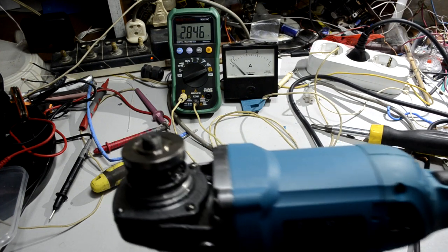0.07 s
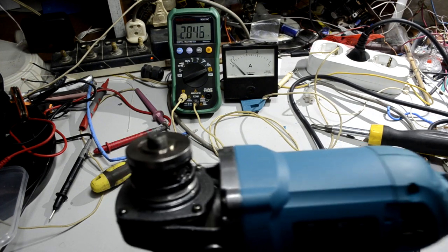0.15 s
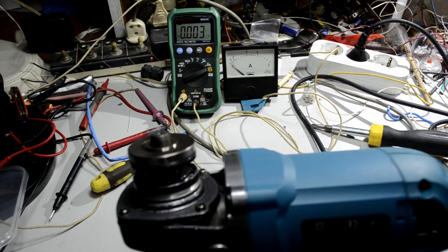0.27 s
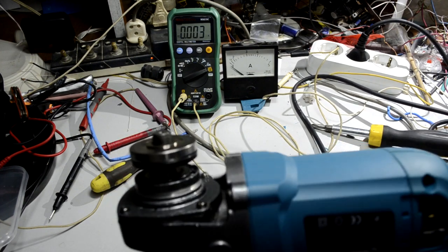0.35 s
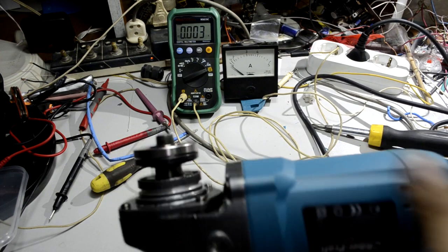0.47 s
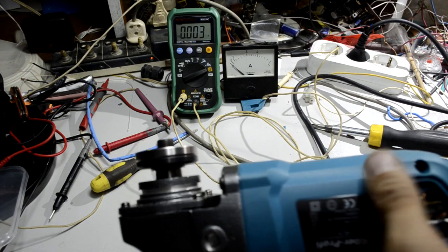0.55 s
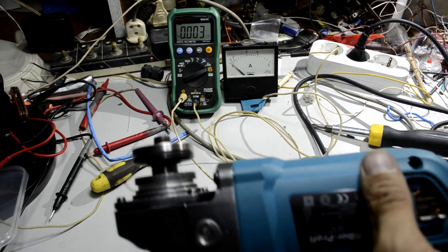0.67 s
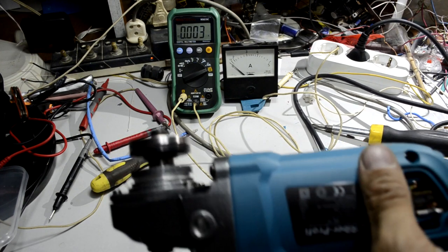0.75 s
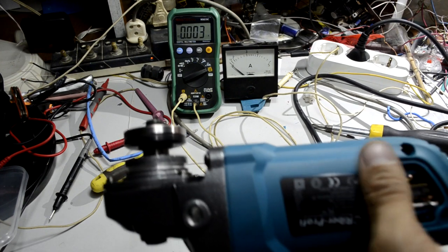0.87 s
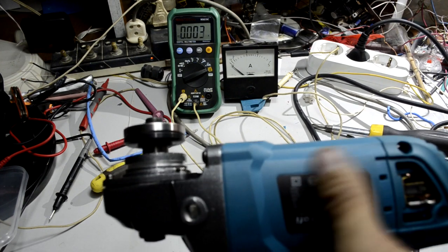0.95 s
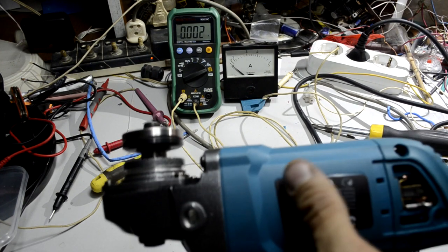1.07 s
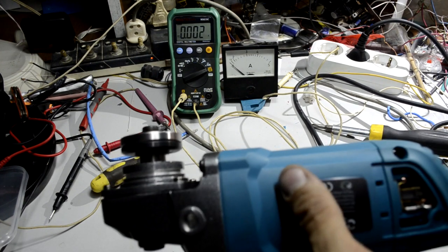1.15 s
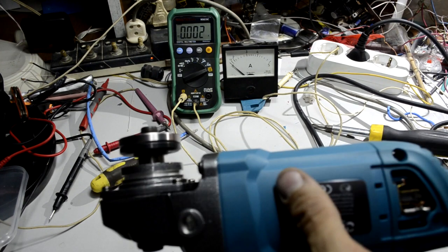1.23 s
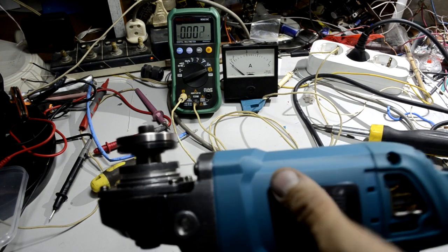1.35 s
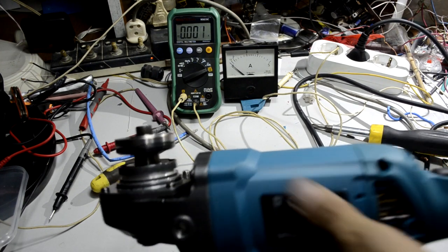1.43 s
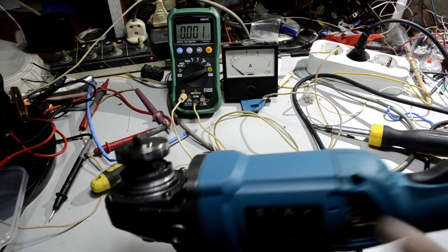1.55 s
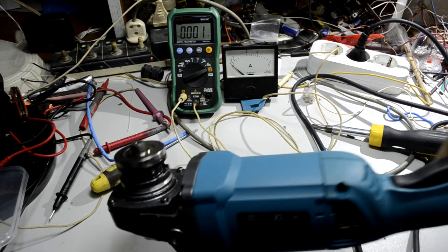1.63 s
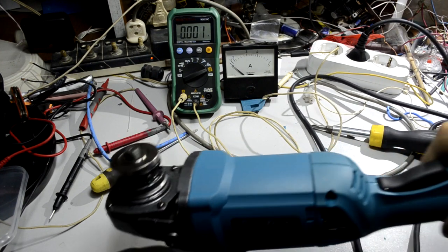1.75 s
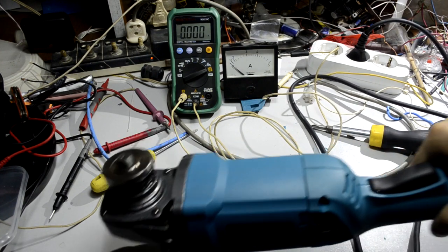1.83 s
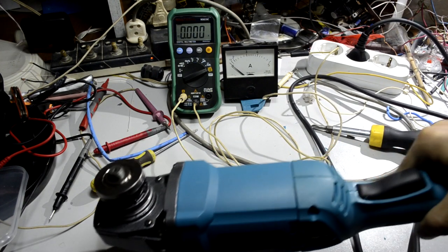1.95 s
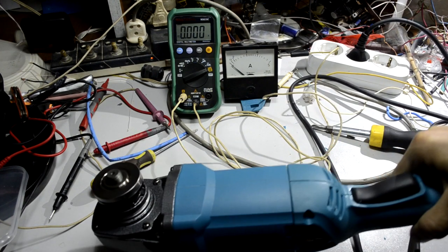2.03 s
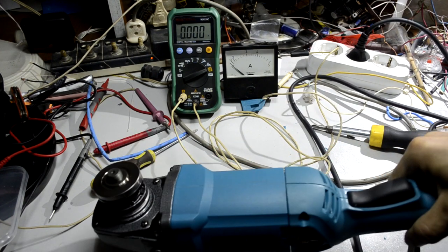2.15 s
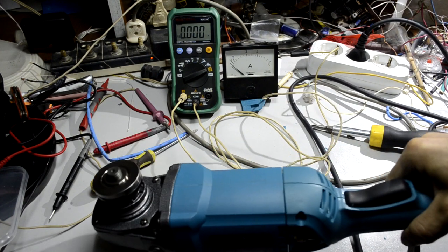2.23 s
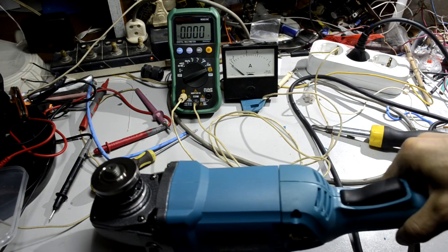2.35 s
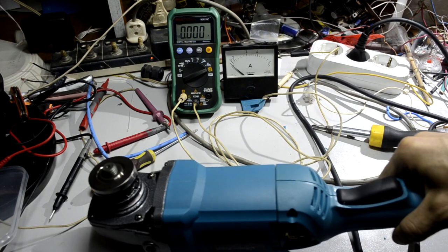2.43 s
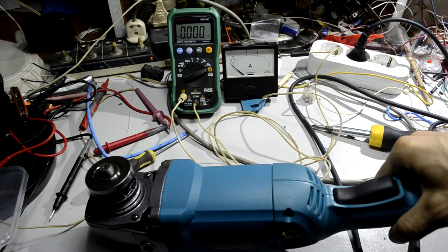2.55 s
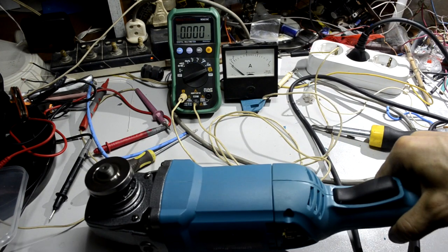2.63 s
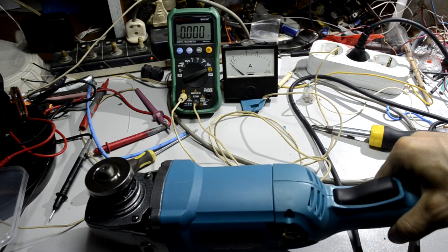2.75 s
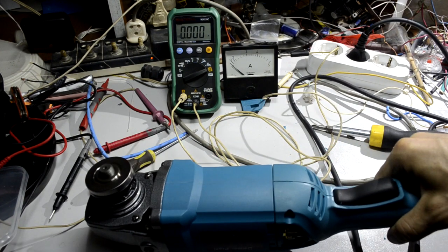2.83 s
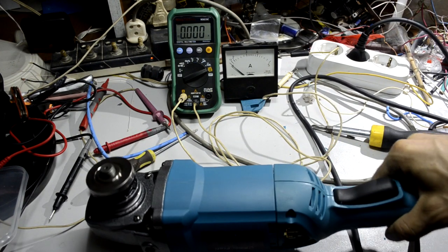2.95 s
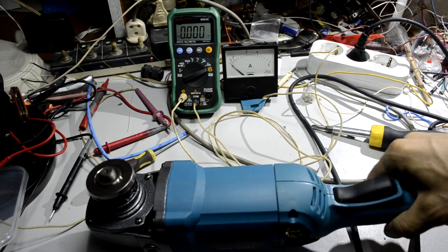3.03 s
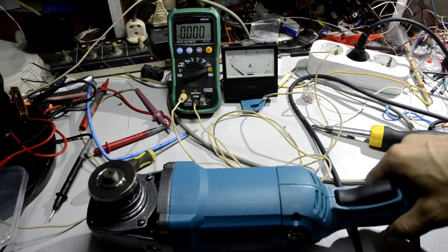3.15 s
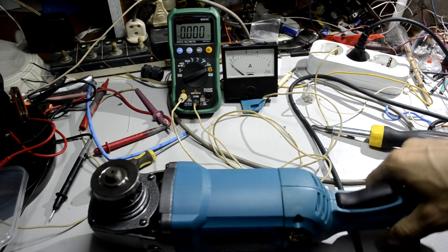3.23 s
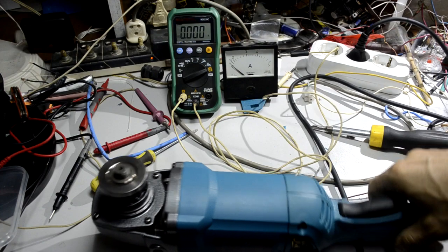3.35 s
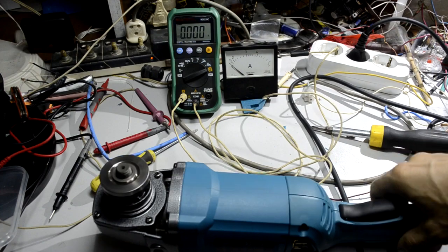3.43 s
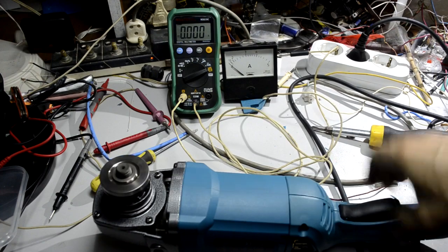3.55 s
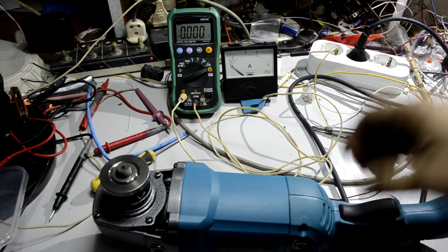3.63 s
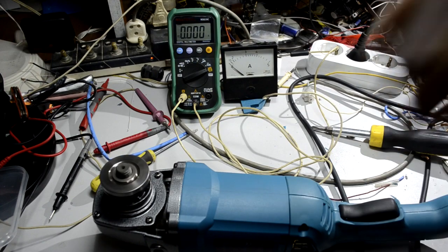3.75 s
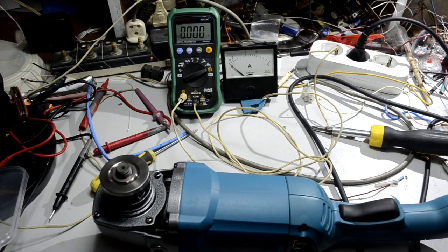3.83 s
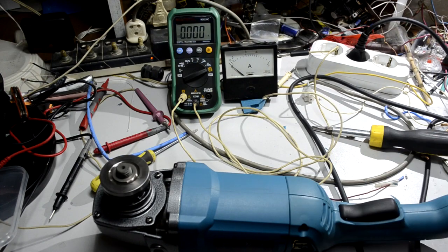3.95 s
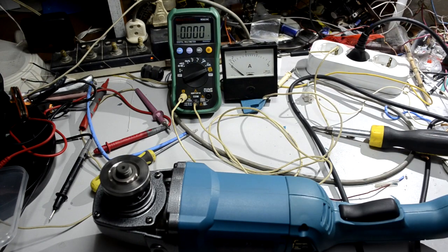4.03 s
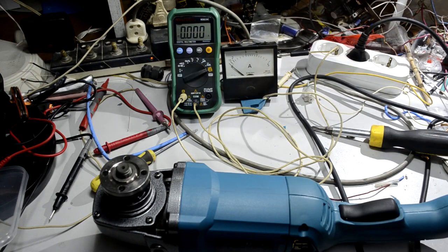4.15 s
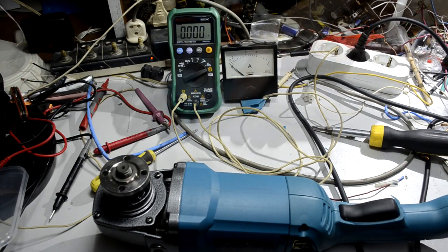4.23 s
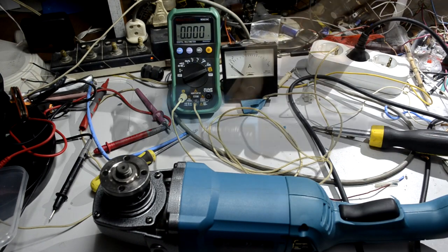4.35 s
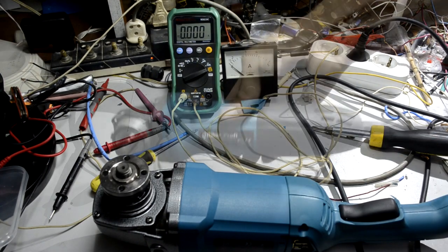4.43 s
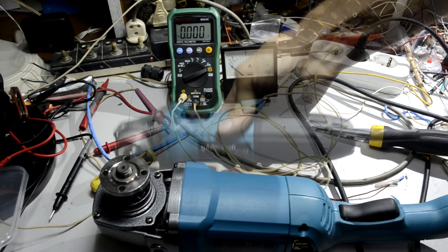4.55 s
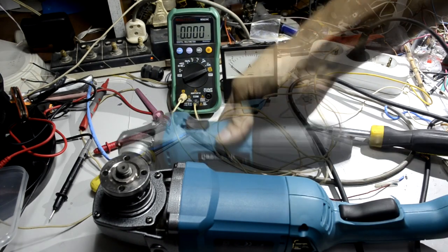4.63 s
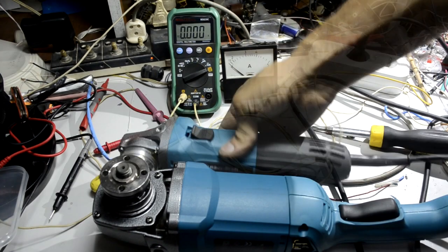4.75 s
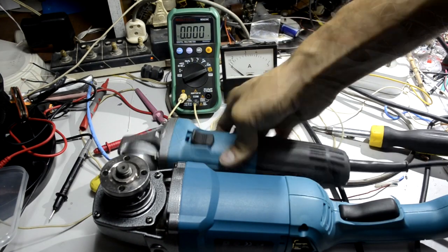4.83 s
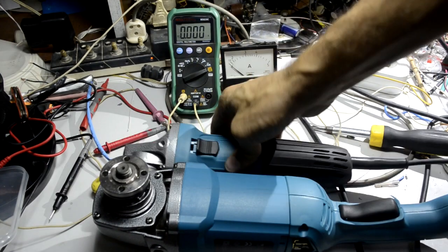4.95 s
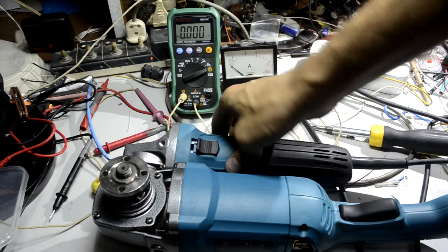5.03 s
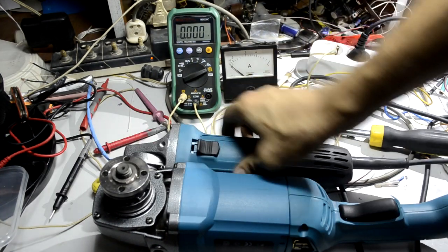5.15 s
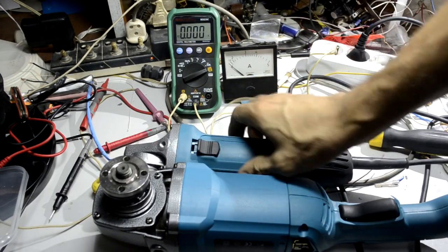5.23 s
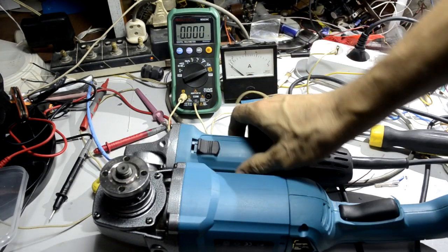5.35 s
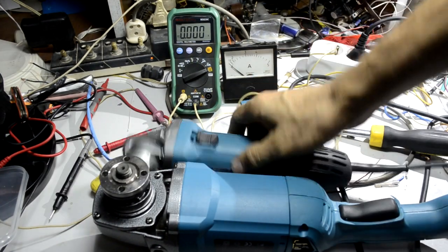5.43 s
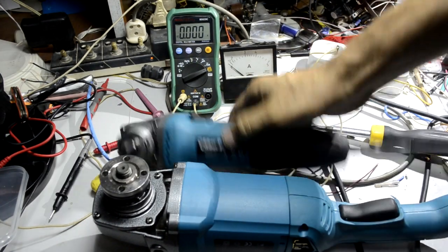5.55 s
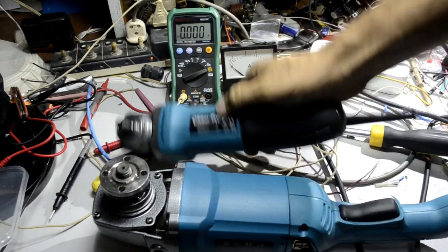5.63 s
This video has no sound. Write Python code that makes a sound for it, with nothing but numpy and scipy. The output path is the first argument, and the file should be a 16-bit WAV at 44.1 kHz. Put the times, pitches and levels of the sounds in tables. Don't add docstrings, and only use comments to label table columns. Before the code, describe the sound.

At 0 s a loud, rough roar is already falling: an angle grinder with no disc, switched off, very near the microphone. Fan air, bright brush hiss and harsh loose-gear rattle blend with thin tones that sink as the rotor slows. From about 0.8 s sharp tooth snaps crowd in. Around 1.5 s the gear head swings towards us, and the rattle changes colour, becoming more ringing and hollow. Soft, low thuds at 2.3-2.5 s, partly hidden, place it on a workbench. By 2.9 s the chatter has thinned to distinct metallic clacks, strongest near 3.1 s, then weaker and wider apart, ending in tiny clicks around 4.05-4.15 s. Quiet room tone with faint hum remains. A second tool knocks lightly on the bench, clearest at 4.66 and 4.94 s, with smaller taps and a faint grainy slide, strongest near 5.4 s, until about 5.7 s. Short room echo, mono sound.

```python
import sys
import numpy as np
from scipy import signal
from scipy.fft import rfft, irfft
from scipy.io import wavfile
from scipy.ndimage import uniform_filter1d, map_coordinates

SR = 44100
rng = np.random.default_rng(int(sys.argv[2]) if len(sys.argv) > 2 else 0)


def nominal_scale(level):
    x = np.asarray(level, float) / 20
    return 10 ** x


def digitize_waveform(pressure):
    field = np.atleast_2d(pressure).T
    bounded = np.clip(field, -1, 1)
    quanta = np.round(bounded * 32767).astype(np.int16)
    wavfile.write(sys.argv[1], SR, quanta)


N = 250913

# start_s, share_0_to_1
HEAD_TURN = [
    (0, 0.19),
    (1.47, 0.23),
    (1.57, 0.58),
    (5.7, 0.9),
]
# multiple_of_rotor_speed, level_db
BRUSH_OVERTONES = [(36, -14), (48, 2), (72, 0), (96, 3), (120, -1), (144, -2), (168, 0), (192, 0), (216, 0),
                   (240, 0)]
BLADE_TONES = [(29, 0), (39, -10)]

# pitch_hz, level_db
ROAR_COLOUR = [(41, -58), (70, -37.5), (237, -14.5), (324, -19.5), (399, -7), (449, -10), (749, -1.5),
               (799, -5), (865, 0), (1600, -10), (2080, -29.5), (3520, -120)]
SIDE_COLOUR = [(530, -33), (900, 0.5), (1680, -5.5), (2040, -2.5), (2630, -1), (3260, -4.5), (3760, -5.5),
               (6000, -26.5), (7800, -74.5), (13200, -120)]
HEAD_COLOUR = [(530, -38.5), (900, 2), (1270, -17.5), (1870, -3.5), (2050, -3.5), (2310, -4), (4400, -12),
               (6000, -34), (7800, -50), (13200, -120)]
HISS_COLOUR = [(2530, -31.5), (4300, -0.5), (4740, -11), (5860, -9.5), (6630, -9.5), (7510, -10),
               (8840, -11), (9490, -13.5), (11800, -12), (13800, -16.5), (15700, -31.5)]
BRUSH_COLOUR = [(2500, -30), (4300, -12), (6500, -8), (8500, -11), (10500, -6), (12000, -3), (15500, -5)]
DARK_COLOUR = [(20, -60), (1200, -45), (9000, -45), (16000, -70)]
SNAP_SIDE_COLOUR = [(300, -40), (1000, -9), (1800, -2), (2600, -4), (3300, 0), (4300, -8), (5200, -28),
                    (9000, -32), (15000, -55)]
SNAP_HEAD_COLOUR = [(300, -40), (900, -7), (1450, 0), (1800, -4), (2700, -4), (3300, -8), (4400, -12),
                    (5200, -30), (15000, -60)]
CLACK_COLOUR = [(150, -72), (250, -40.5), (1470, -1), (1780, -4), (2010, -8), (2310, -19), (3200, -14),
                (3420, -26), (4260, -28), (6500, -42), (8450, -70), (14300, -120)]
THUMP_COLOUR = [(120, -34), (280, -5), (520, 0.5), (850, -4), (1300, -22), (3000, -59)]
TICK_COLOUR = [(1500, -52), (2800, -9.5), (3800, 11.5), (4700, -0.5), (6000, -17), (12000, -43.5),
               (16000, -52)]
ROOM_COLOUR = [(15, -39), (25, -2.5), (71, -26.5), (91, -16.5), (246, -12.5), (297, -10), (457, -7),
               (1140, -11), (2360, -19), (3530, -21), (4500, -34), (13500, -39), (15500, -31.5)]
SLIDE_COLOUR = [(120, -24.5), (200, -3.5), (433, -12), (575, -17.5), (657, -33), (708, -17.5),
                (1300, -11.5), (1810, -12), (7000, -45.5), (9100, -70), (15400, -120)]
RUMBLE_COLOUR = [(25, -21.5), (60, -6), (110, 1), (170, -4), (260, -27.5), (600, -74)]
MICROPHONE_RANGE = [(15, -30), (45, -4), (80, 0), (15800, 0), (15950, -70)]

# pitch_hz, width_hz, lift_db
SHELL_RINGS = [(379.5, 13, 3), (786, 17, 7), (855, 71, 5), (986, 16, 8.5), (1094, 40, 8.5)]
CASE_SIDE_RINGS = [(1590, 36, 2.6), (1850, 90, 4), (2060, 70, 4), (2330, 55, 5.7), (3190, 100, 3),
                   (3370, 70, 4.4), (4270, 67, 7.3)]
CASE_HEAD_RINGS = [(1290, 60, -6), (1490, 25, 3), (1610, 50, 2.8), (2016, 41, 6), (2595, 54, 3.5),
                   (2764, 94, 3.4), (3010, 49, 4), (4340, 40, 9.5)]
VENT_RINGS = [(7440, 110, 6.3), (7660, 280, 1.5), (8000, 90, 1.7), (10080, 450, 1.7), (11470, 190, 2.1)]
SPINDLE_RINGS = [(7320, 420, 22), (7810, 640, 30.5), (11790, 760, 32)]
UPPER_RINGS = [(3250, 1100, 35), (3165, 110, 13), (3420, 90, 7)]
LOWER_RINGS = [(2040, 550, 24), (2016, 50, 11)]
BEARING_DIP = [(400, 500, -13)]
SNAP_SIDE_RINGS = [(2000, 150, 4), (3160, 100, 12), (3430, 90, 7)]
SNAP_HEAD_RINGS = [(1480, 150, 4), (2016, 45, 14), (2620, 120, 4)]
CLACK_RINGS = [(1430, 60, 4), (1900, 300, 6), (2014, 70, 4.5), (2550, 530, 6)]
TOOL_RINGS = [(750, 130, 9), (1000, 130, 7), (1110, 50, 7), (1460, 160, 9.5), (1894, 110, 3.6),
              (2550, 66, 3.4), (3770, 76, 2.3)]
SCRAPE_RINGS = [(1500, 150, 6), (1800, 200, 6)]
FAR_FAN_RINGS = [(1130, 150, 4), (2800, 150, 3), (3450, 150, 8)]

# start_s, peak_db
EARLY_SNAPS = [(0.3209, -4), (0.403, -4), (0.422, -4), (0.5775, -4), (0.6193, -5), (0.723, -5),
               (0.7337, -4), (0.7704, -4), (0.7952, -5), (0.804, -4), (0.8174, -4), (0.8403, -4),
               (0.865, -4), (0.8858, -3), (0.9032, -5), (0.9137, -4), (0.9455, -5), (0.9598, -3),
               (0.9836, -4), (1.0092, -3), (1.0218, -6), (1.0348, -4), (1.0515, -5), (1.0655, -5),
               (1.0841, -5), (1.0957, -5), (1.111, -5), (1.1252, -5), (1.1385, -5), (1.1547, -5),
               (1.1697, -6), (1.1814, -7), (1.1923, -7), (1.2065, -3), (1.22, -7), (1.2335, -2),
               (1.2498, -6), (1.2713, -5), (1.2828, -4), (1.2901, -6), (1.3035, -7), (1.3192, -7),
               (1.329, -6), (1.3471, -3), (1.3625, -4), (1.3789, -5), (1.393, -6), (1.3993, -6),
               (1.4197, -3), (1.439, -2), (1.4548, -3), (1.4694, -8), (1.4828, -7), (1.497, -7),
               (1.512, -7), (1.5244, -6), (1.5392, -7), (1.5471, -6)]
TURNED_SNAPS = [(1.5635, -6), (1.5819, -4), (1.5882, -9), (1.5947, -6), (1.6068, -5), (1.6445, -8),
                (1.6634, -9), (1.6696, -9), (1.6795, -5), (1.6956, -9), (1.7054, -8), (1.7167, -5),
                (1.733, -7), (1.7467, -9), (1.7571, -9), (1.7713, -8), (1.7889, -5), (1.8047, -6),
                (1.8172, -9), (1.8252, -10), (1.8567, -9), (1.8658, -11), (1.8776, -7), (1.9024, -11),
                (1.9171, -7), (1.9269, -9), (1.9408, -7), (1.9593, -7), (1.9736, -7), (1.983, -11),
                (1.9892, -10), (1.9953, -10), (2.0049, -10), (2.0174, -12), (2.0385, -10), (2.0533, -8),
                (2.0614, -11), (2.0727, -10), (2.1067, -10), (2.13, -11), (2.1463, -11), (2.1614, -10),
                (2.1751, -6), (2.1905, -8), (2.2102, -10), (2.2191, -11), (2.2367, -5), (2.252, -7),
                (2.2678, -7), (2.2919, -8)]
SLOW_SNAPS = [(2.3024, -13), (2.3183, -11), (2.3295, -9), (2.3384, -10), (2.3461, -13), (2.3541, -9),
              (2.3666, -11), (2.3818, -12), (2.3952, -12), (2.4022, -9), (2.415, -7), (2.4292, -12),
              (2.4378, -14), (2.4472, -8), (2.4705, -7), (2.4976, -8), (2.5118, -10), (2.5276, -6),
              (2.5374, -11), (2.5457, -6), (2.5648, -10), (2.574, -9), (2.5809, -9), (2.5924, -8),
              (2.6075, -8), (2.6231, -11), (2.6411, -13), (2.6649, -10), (2.6882, -10), (2.7015, -11),
              (2.712, -14), (2.7272, -13), (2.7334, -17), (2.7429, -10), (2.7672, -12), (2.7778, -12),
              (2.7931, -12), (2.8081, -12), (2.8241, -13), (2.8426, -9), (2.849, -14), (2.8554, -15),
              (2.871, -15), (2.8861, -14), (2.9013, -16)]
# start_s, peak_db, tooth_tick_db
SINGLE_CLACKS = [(2.919, -7, -12), (2.94, -11, -6), (2.958, -8, -10), (2.979, -10, -7), (3.007, -1, -24),
                 (3.039, -5.5, -6), (3.076, 0, -32), (3.113, -5.5, -11.5), (3.159, -2, -27),
                 (3.203, -8, -11), (3.223, -5.5, -8), (3.25, -11.5, 1), (3.273, -7.5, -9),
                 (3.289, -6.5, -7), (3.316, -5.5, -8), (3.368, -3.5, -11), (3.387, -4, -32),
                 (3.43, -8, -5.5), (3.48, -12, -3.5), (3.525, -13, -1.5), (3.556, -8, -20),
                 (3.624, -12, -6.5), (3.696, -17, -15), (3.736, -12, -11), (3.753, -9.5, -25),
                 (3.792, -10, -28), (3.892, -10.5, -27), (3.942, -12, -17.5), (3.981, -21, -25),
                 (4.028, -11.5, -31)]
# start_s, peak_db
LAST_CLICKS = [
    (4.053, -24),
    (4.066, -22),
    (4.084, -30),
    (4.106, -31),
    (4.129, -27.5),
    (4.155, -34),
]
# start_s, peak_db, low_push_db
BENCH_THUDS = [
    (2.338, -21.5, -15),
    (2.46, -19, -24),
    (2.529, -36, -15),
    (2.935, -37, -15),
    (3.027, -40, -22),
    (3.179, -38, -12),
    (3.429, -32, -8),
]
# start_s, peak_db, centre_hz, bench_boom_db, tick_db
TOOL_KNOCKS = [(4.38, -54, 1000, -23, 3), (4.575, -47, 1010, -26, 7.5), (4.609, -50, 401, -22, 7),
               (4.6635, -12.5, 1480, -13.5, -21), (4.678, -20.5, 1400, -8.5, -21),
               (4.734, -26, 520, -11, -28.5), (4.777, -27.5, 900, -14, -36), (4.9357, -12.5, 900, -27, -21),
               (4.958, -32, 1060, -1.5, -8), (4.984, -40, 412, -12, -1), (5.027, -51.5, 415, -26, -18),
               (5.149, -32, 643, -9, -33), (5.17, -36, 433, -9.5, -6), (5.239, -37.5, 1650, -26, -19),
               (5.301, -34, 1170, -37, 1), (5.442, -21.5, 620, -5.5, -40), (5.472, -36, 501, -12, -25),
               (5.59, -27.5, 1520, -9, -30), (5.675, -45, 791, -20, -4)]
# start_s, level_db
TOOL_SLIDE = [
    (4.55, -58.5),
    (5.12, -64),
    (5.2, -54.5),
    (5.4, -48.5),
    (5.5, -56),
    (5.69, -58.5),
]
# start_s, level_db
BENCH_RUMBLE = [
    (2.2, -73),
    (2.52, -58),
    (3.95, -72),
    (5.69, -66),
]
# pitch_hz, level_db, fade_60db_s
BENCH_MODES = [(121.3, -4.5, 0.25), (170, 3, 0.16), (266, -2, 0.19)]
PUSH_MODES = [(54.7, -7.5, 0.057), (90, 2.5, 0.06)]
# pitch_hz, level_db
HUM_TONES = [(301.5, -64.5), (398.4, -73.5), (769.8, -79), (936.7, -83), (1152, -69.5), (2805, -79.5),
             (3418, -83), (15682, -77)]
# pitch_hz, fade_60db_s
ROOM_FADE = [(200, 0.29), (2000, 0.18), (10000, 0.26)]

FULL_SPEED, FRICTION, BEARING_DRAG, FAN_DRAG = 419.14, 65.11, .15042, .00022923
CREEP, STOP_S, SETTLE_S = 2.9, 4.2, 0.024
FAN = (-16, 0.35, 0.08, -5.5)
BEARINGS = (-27, 0.29, .001, -1.5)
GEARS = (-14.5, 0.44, 0.021, -3.3)
BRUSHES = (-25, 1.87, .001, 0)
# level_db, loss_db per dB of slowing, centre_hz, width_hz, lift_db
UNBALANCE = (-51, .9, 430, 145, 24)
BARS = (-55.5, -.3, 2900, 1200, 19.5)
SLOTS = (-62, -.3, 4000, 900, 18)
OVERTONES = (-47, 1.15, 900, 1700, -12)
FAN_BLADES = (-54, .7, 9400, 3200, 13)
UPPER_SING = (-21, 0, 3150, 1500, 16)
SPINDLE_BUZZ = (-36, -0.3, 124.5, 110, 14)
CLACK_SPINDLE = (-26.5, 0.86, 120, 119.5, 15)
PINION_TEETH, UPPER_SHADED_DB = 13, -12
LOWER_DB, LOWER_FACING_DB, LOWER_FALL = -20.5, 36, 1.35
GRIP_SPEED, HEAD_UP_CALMS = 33, .6
SHAKEN_SHARE, SHAKE_S, CHATTER_FROM_S, SHAKE_GROWS_S = .6, .006, 1.2, .9
SNAP_DB, SNAP_TAIL, SNAP_TAIL_S, SNAP_SPINDLE_DB, SNAP_FACING_DB = -.5, .24, .026, -9, 2
LOW_DB, LOW_RISE_DB, COLOUR_SCATTER_DB, LAST_TICK_DB = -19, 19, 2, -30
KNOCK_T60_S, SOFT_LASTS = 0.044, .03


def unit(x):
    return x / np.sqrt(np.mean(x ** 2) + 1e-20)


def along(points, hz):
    f, v = np.transpose(points)
    return np.interp(np.log(hz + 1), np.log(f + 1), v)


def curves(rows):
    s, *cols = np.transpose(rows)
    return [np.interp(np.arange(N) / SR, s, c) for c in cols]


def wobble(rate):
    knots = rng.standard_normal(int(N * rate / SR) + 4)
    return map_coordinates(knots, [np.arange(N) * rate / SR])


def body(x, spectrum, modes=()):
    m = 2 ** 14
    hz = np.fft.rfftfreq(m, 1 / SR)
    db = along(spectrum, hz)
    for centre, width, lift in modes:
        db = db + lift / (1 + (2 * (hz - centre) / width) ** 2)
    cep = irfft(np.log(nominal_scale(db) + 1e-6), m)
    cep[1:m // 2] *= 2
    cep[m // 2 + 1:] = 0
    answer = irfft(np.exp(rfft(cep)), m)[:m // 8]
    sound = signal.fftconvolve(np.atleast_2d(x), answer[None], axes=1)
    return sound[:, :x.shape[-1]].reshape(x.shape)


def rotor():
    speeds = np.linspace(FULL_SPEED, 0, 4000)
    braking = FRICTION + BEARING_DRAG * speeds + FAN_DRAG * speeds ** 2
    reached_s = np.cumsum((speeds[0] - speeds[1]) / braking)
    speed = np.interp(np.arange(N) / SR, reached_s - reached_s[0], speeds)
    return speed, 20 * np.log10((speed + CREEP) / FULL_SPEED)


def passing(multiple, db, fall, centre, width, lift_db):
    speed, slow_db = rotor()
    return db + fall * slow_db + lift_db / (1 + (2 * (multiple * speed - centre) / width) ** 4)


def teeth(per_turn, spread_db):
    hit = rng.random(N) < (per_turn * rotor()[0] + 20) / SR
    blows = hit * nominal_scale(spread_db * np.minimum(rng.exponential(size=N), 3))
    fade = nominal_scale(-60 * np.arange(SR // 50) / SR / 0.0099)
    blows = signal.fftconvolve(blows, fade)[:N] * rng.standard_normal(N)
    return blows / np.sqrt(np.abs(uniform_filter1d(blows ** 2, SR // 4)) + 1e-9)


def grinder(shake):
    speed, slow_db = rotor()
    up, = curves(HEAD_TURN)
    fan, bearings, gears, brushes = (
        nominal_scale(db + fall * slow_db - bend * slow_db ** 2 + facing_db * up)
        for db, fall, bend, facing_db in (FAN, BEARINGS, GEARS, BRUSHES))
    upper = nominal_scale(passing(PINION_TEETH, *UPPER_SING) + UPPER_SHADED_DB * up ** 2)
    lower = nominal_scale(LOWER_DB + LOWER_FACING_DB * up + LOWER_FALL * slow_db)
    contacts = teeth(per_turn=0.84, spread_db=.3)
    loose = np.clip(speed / 130, .25, 1) * np.clip(1 - HEAD_UP_CALMS * up, 0, 1)
    mesh = .8 * loose * contacts + np.sqrt(1.46 ** 2 + 1 - loose ** 2) * rng.standard_normal(N)

    roar = unit(body(mesh + 1.19 * rng.standard_normal(N), ROAR_COLOUR, SHELL_RINGS))
    whirr = unit(body(0.77 * mesh + rng.standard_normal(N), ROAR_COLOUR, SHELL_RINGS + BEARING_DIP))
    rattle = (1 - up) * unit(body(mesh, SIDE_COLOUR, CASE_SIDE_RINGS))
    rattle += up * unit(body(mesh, HEAD_COLOUR, CASE_HEAD_RINGS))
    rattle += upper * unit(body(0.3 * contacts + mesh, DARK_COLOUR, UPPER_RINGS))
    rattle += lower / shake * unit(body(mesh, DARK_COLOUR, LOWER_RINGS))
    hiss = unit(body(rng.standard_normal(N) + 0.054 * loose * contacts, HISS_COLOUR, VENT_RINGS))
    buzz = up * nominal_scale(passing(1, *SPINDLE_BUZZ)) * unit(body(contacts, DARK_COLOUR, SPINDLE_RINGS))

    grip = (speed + 1) / np.hypot(speed + 1, GRIP_SPEED)
    swell = nominal_scale(0.19 * wobble(7.7))
    gear_noise = gears * grip * shake * (rattle + shake * buzz)
    moving = swell * (fan * roar + bearings * grip ** .7 * whirr + gear_noise)
    on = np.clip((STOP_S - np.arange(N) / SR) / SETTLE_S, 0, 1)
    return on * (moving + brushes * hiss)


def orders(table, flutter_db):
    speed = rotor()[0]
    turns = np.cumsum(speed) / SR
    total = np.zeros(N)
    for multiple, db in table:
        audible = multiple * speed < .45 * SR
        level = nominal_scale(db + flutter_db * wobble(25)) * np.sqrt(2)
        total += level * np.sin(2 * np.pi * multiple * turns) * audible
    return total


def whine():
    fading = np.clip(rotor()[0] / 60 - .5, 0, 1)
    shaft = nominal_scale(passing(1, *UNBALANCE)) * orders([(1, 0)], flutter_db=2.5)
    bars = nominal_scale(passing(24, *BARS)) * orders([(24, 0), (23, -12), (25, -12)], flutter_db=3)
    slots = nominal_scale(passing(36, *SLOTS)) * orders([(36, 0)], flutter_db=1.5)
    overtones = nominal_scale(passing(24, *OVERTONES)) * body(orders(BRUSH_OVERTONES, flutter_db=2.5), BRUSH_COLOUR)
    blades = nominal_scale(passing(29, *FAN_BLADES)) * orders(BLADE_TONES, flutter_db=3)
    return fading * (shaft + bars + slots + overtones + blades)


def quiet():
    t = np.arange(N) / SR
    tones = sum(nominal_scale(db + 1 + wobble(5)) * np.sin(2 * np.pi * hz * t) for hz, db in HUM_TONES)
    return nominal_scale(-58.0 + wobble(5.4)) * unit(body(rng.standard_normal(N), ROOM_COLOUR, FAR_FAN_RINGS)) + tones


def burst(t60, rise=0.00069, count=1, crack=0):
    t = np.arange(SR // 12) / SR
    blows = rng.standard_normal((count, len(t))) * nominal_scale(-60 * t / t60) * (1 - np.exp(-t / rise))
    return blows + crack * (np.arange(len(t)) == 0)


def struck(blows, spectrum, modes=()):
    sound = body(blows, spectrum, modes)
    return sound / np.abs(sound).max(axis=1, keepdims=True)


def add(track, s, sound):
    track[round(s * SR):][:len(sound)] += sound


def snaps():
    rows = np.r_[EARLY_SNAPS, TURNED_SNAPS, SLOW_SNAPS]
    n = len(rows)
    up, = curves(HEAD_TURN)
    blows = SNAP_TAIL * burst(SNAP_TAIL_S, rise=.0004, count=n) + .5 * burst(.003, crack=4, count=n)
    side = struck(blows, SNAP_SIDE_COLOUR, SNAP_SIDE_RINGS)
    head = struck(blows, SNAP_HEAD_COLOUR, SNAP_HEAD_RINGS)
    spindle = struck(burst(.008, count=n), DARK_COLOUR, SPINDLE_RINGS)
    spindle_db = passing(0.96, *CLACK_SPINDLE) + SNAP_SPINDLE_DB
    chance_db = 3 * rng.standard_normal(n)
    track = np.zeros(N + SR)
    for k, (s, db) in enumerate(rows):
        i = round(s * SR)
        case = nominal_scale(SNAP_FACING_DB) * head[k] if up[i] > .5 else side[k]
        add(track, s, nominal_scale(db + SNAP_DB) * (case + nominal_scale(spindle_db[i] + chance_db[k]) * spindle[k]))
    return track[:N]


def shaken(blows):
    size = round(SHAKE_S * SR)
    quick = np.abs(uniform_filter1d(blows ** 2, size, origin=size // 2 - 1))
    ratio = quick / (np.abs(uniform_filter1d(quick, SR // 5)) + 1e-9)
    share = SHAKEN_SHARE * np.clip((np.arange(N) / SR - CHATTER_FROM_S) / SHAKE_GROWS_S, 0, 1)
    return np.sqrt(1 - share + share * np.minimum(ratio, 4))


def workshop(x):
    hz, t, z = signal.stft(rng.standard_normal(SR // 2), SR, nperseg=256)
    fade = nominal_scale(-60 * t / along(ROOM_FADE, hz)[:, None])
    tail = signal.istft(z * fade, SR, nperseg=256)[1]
    return signal.fftconvolve(np.pad(x, (200, 0)), tail / np.linalg.norm(tail))[:N]


def drag():
    slide_db, = curves([(TOOL_SLIDE[0][0] - .03, -90)] + list(TOOL_SLIDE))
    rumble_db, = curves([(BENCH_RUMBLE[0][0] - .05, -90)] + list(BENCH_RUMBLE))
    slide = unit(body(rng.standard_normal(N), SLIDE_COLOUR, SCRAPE_RINGS))
    rumble = unit(body(rng.standard_normal(N), RUMBLE_COLOUR))
    return nominal_scale(slide_db + 2.2 * wobble(40)) * slide + nominal_scale(rumble_db + 1.1 * wobble(11)) * rumble


def ring(modes, stretch=1, scatter_db=3):
    t = np.arange(SR // 4) / SR
    return sum(nominal_scale(db + scatter_db * rng.normal() - 60 * t / (t60 * stretch)) * np.sin(2 * np.pi * hz * t)
               for hz, db, t60 in modes)


def bench():
    top = np.zeros(N + SR)
    soft = 1 - np.exp(-np.arange(SR // 4) / SR / 0.0019)
    for s, db, push_db in BENCH_THUDS:
        add(top, s, nominal_scale(db + push_db + 6.5) * soft * ring(PUSH_MODES, scatter_db=4.0))
        add(top, s, nominal_scale(db - 3.5) * soft * ring(BENCH_MODES, stretch=.85, scatter_db=1.5))

    n = len(TOOL_KNOCKS)
    tick_colour = [(1200, -22), (2800, 15.5), (3700, 5), (5000, -0.5), (9000, -9.0), (16000, -18)]
    ticks = struck(burst(0.0079, count=n) + 0.11 * burst(0.097, count=n), tick_colour)
    for tick, (s, db, hz, boom_db, tick_db) in zip(ticks, TOOL_KNOCKS):
        t60 = KNOCK_T60_S * (1 + abs(SOFT_LASTS * (db + 9)))
        colour = [(100, -45), (0.13 * hz, -9), (hz, 0), (1.22 * hz, -6), (4500, -24), (9000, -55)]
        knock = struck(burst(t60, rise=0.00078, crack=9), colour, TOOL_RINGS)[0]
        add(top, s, nominal_scale(db - 0.9) * knock)
        add(top, s, nominal_scale(db + boom_db - 2.0) * soft * ring(BENCH_MODES, stretch=.8, scatter_db=1.8))
        add(top, s, nominal_scale(db + tick_db - 0.5) * tick)
    return top[:N]


def clacks():
    rows = list(SINGLE_CLACKS) + [(s, db, LAST_TICK_DB) for s, db in LAST_CLICKS]
    n = len(rows)
    speed, spindle_db = rotor()[0], passing(0.96, *CLACK_SPINDLE)
    blows = burst(0.014, rise=0.00041, count=n, crack=3.8) + 0.37 * burst(0.049, rise=0.0034, count=n)
    case = struck(blows, CLACK_COLOUR, CLACK_RINGS)
    shell = struck(blows, THUMP_COLOUR)
    tick = struck(blows, TICK_COLOUR)
    spindle = struck(burst(0.0072, count=n), DARK_COLOUR, SPINDLE_RINGS)
    chance_db = COLOUR_SCATTER_DB * rng.standard_normal((n, 2))
    track = np.zeros(N + SR)
    for k, (s, db, tick_db) in enumerate(rows):
        i = round(s * SR)
        low_db = LOW_DB + LOW_RISE_DB * np.exp(-speed[i] / 15) + chance_db[k, 0]
        clack = case[k] + nominal_scale(low_db) * shell[k] + nominal_scale(tick_db - 2) * tick[k]
        clack += nominal_scale(spindle_db[i] + chance_db[k, 1]) * spindle[k]
        add(track, s, nominal_scale(db - 6.2) * clack)
    return track[:N]


def scene():
    gear_hits = clacks() + snaps()
    hits = gear_hits + bench()
    machine = grinder(shaken(gear_hits)) + whine()
    mono = machine + hits + nominal_scale(-8.0) * workshop(hits) + drag() + quiet()
    return np.array([mono, mono])


def top_cut(x):
    return signal.sosfilt(signal.butter(12, 15950, fs=SR, output="sos"), x)


def record(dry):
    heard = body(dry, MICROPHONE_RANGE)
    heard = heard / (1 + np.abs(heard / .97) ** 6) ** (1 / 6)
    return top_cut(heard)


dry = scene()
out = record(dry)
digitize_waveform(out)
```